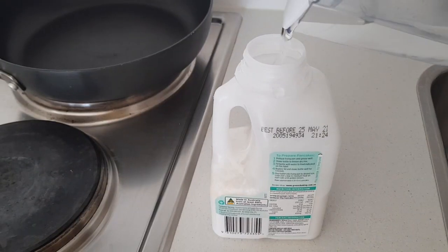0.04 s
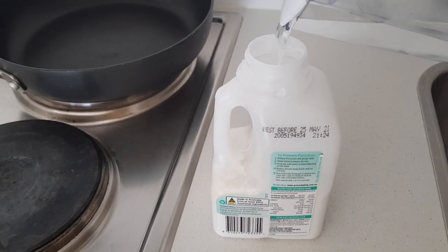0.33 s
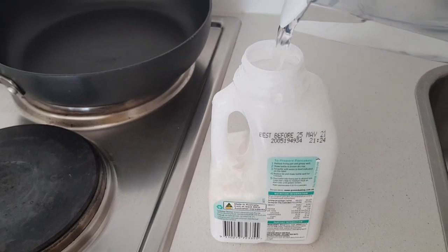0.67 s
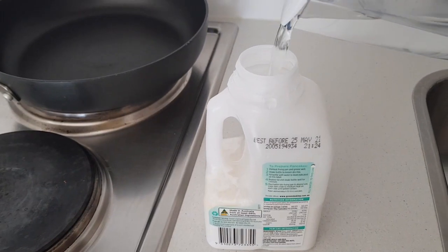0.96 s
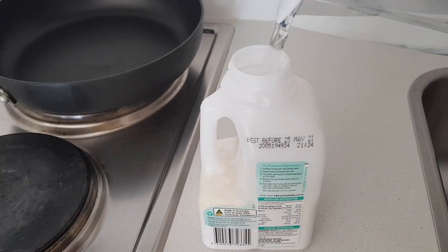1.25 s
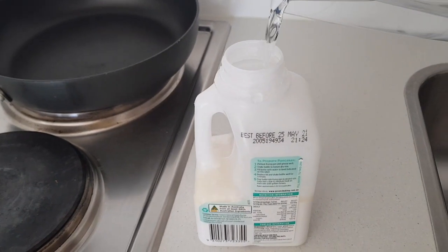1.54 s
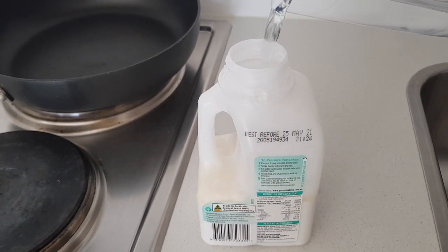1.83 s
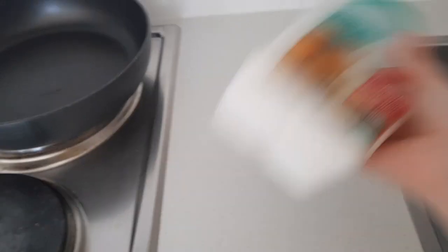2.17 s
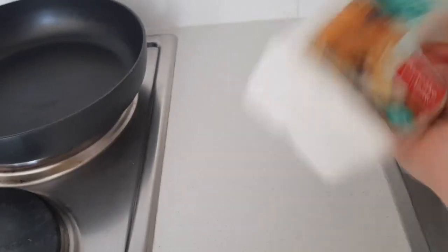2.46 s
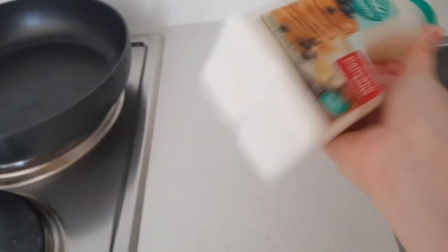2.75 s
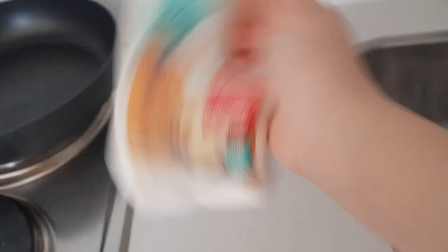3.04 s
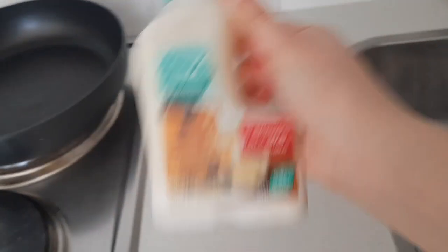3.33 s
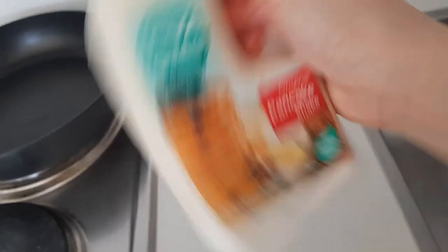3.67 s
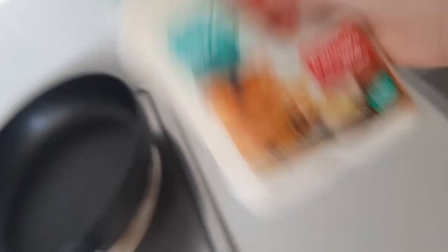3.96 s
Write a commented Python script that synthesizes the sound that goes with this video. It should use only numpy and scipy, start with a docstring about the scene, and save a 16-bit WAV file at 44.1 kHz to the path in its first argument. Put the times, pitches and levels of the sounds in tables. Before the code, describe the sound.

Water in a plastic bottle: first a thin stream patters and bubbles quietly into it, then, after a brief pause, the closed bottle is shaken hard with loud, rhythmic sloshes. Heard close up in a small kitchen.

```python
"""A thin stream of water drums into a plastic bottle on a kitchen counter; bubbles ring more and more.
After a short pause the capped bottle is shaken about four times a second. At each end of the stroke
the water slaps the wall and breaks into bubbles and spray, and towards the end it gulps through the neck.
Drops are tiny clicks and bubbles are fading tones. The room adds a short echo and a low hum."""
import sys
import numpy as np
from scipy import signal
from scipy.fft import rfft, irfft, next_fast_len
from scipy.io import wavfile
from scipy.ndimage import uniform_filter1d

SR = 44100
rng = np.random.default_rng(int(sys.argv[2]) if len(sys.argv) > 2 else 0)


def to_wav(s):
    """Save 16-bit WAV."""
    ch = np.atleast_2d(s).T  # columns
    pcm = np.round(np.clip(ch, -1, 1) * 32767)  # PCM
    wavfile.write(sys.argv[1], SR, pcm.astype(np.int16))


N = 176400  # 4 seconds
TIME = np.arange(N) / SR


def amp(db):
    """Turns decibels into a volume factor."""
    return 10 ** (np.asarray(db) / 20)


def unit(x):
    """Scales a sound to an average (rms) strength of 1."""
    return x / np.sqrt(np.mean(x ** 2) + 1e-20)


def along(points, hz):
    """Reads between the rows of a frequency table."""
    freqs, values = np.transpose(points)
    return np.interp(np.log(hz + 1), np.log(freqs + 1), values)


def level(rows):
    """Joins (seconds, dB) rows into a volume curve."""
    return amp(np.interp(TIME, *np.transpose(rows)))


def add(track, start_s, sound):
    """Mixes a sound into a track."""
    i = int(start_s * SR)
    track[i:i + len(sound)] += sound[:max(len(track) - i, 0)]


def filtered(x, response):
    """Multiplies each frequency in a sound by response(hz)."""
    size = 2 * next_fast_len(len(x) // 2 + 4096)
    return irfft(rfft(x, size) * response(np.fft.rfftfreq(size, 1 / SR)), size)[:len(x)]


def colour(x, points):
    """Turns frequencies up or down by (Hz, dB) rows."""
    def response(hz):
        cepstrum = irfft(np.log(amp(along(points, hz))))
        # folded so the filter rings only after a hit
        cepstrum[1:len(cepstrum) // 2] *= 2
        cepstrum[len(cepstrum) // 2 + 1:] = 0
        return np.exp(rfft(cepstrum))
    return filtered(x, response)


def resonate(x, modes, direct=0):
    """Rings at each (Hz, width, dB) row; direct=1 keeps the plain sound too."""
    return filtered(x, lambda f: direct + sum(
        amp(db) * 1j * f * width / (hz * hz - f * f + 1j * f * width) for hz, width, db in modes))


def band(x, lo_hz, hi_hz, order=3):
    """Keeps the sound between two frequencies."""
    sos = signal.butter(order, [lo_hz, min(hi_hz, .45 * SR)], 'band', fs=SR, output='sos')
    return signal.sosfilt(sos, x)


def linger(hits, fade_s):
    """Gives each hit a fading tail."""
    return signal.lfilter([1], [1, -np.exp(-1 / (fade_s * SR))], hits)


def burst(fade_s):
    """A puff of noise that dies away."""
    return rng.standard_normal(2048) * np.exp(-np.arange(2048) / SR / fade_s)


def drops(count, spread_db):
    """Tiny clicks of uneven size at random times."""
    when, strength, sign = rng.random((count, 3)).T
    size = amp(-spread_db * np.log(.02 + .98 * strength)) * np.sign(sign - .5)
    return unit(np.bincount((when * N).astype(int), size, N))


def bubbles(count, lo_hz, hi_hz, cycles, spread_db, rise=0.57):
    """Random tones; over `cycles` vibrations each fades 40 dB and climbs by the fraction `rise`."""
    when, pitch, strength, sign = rng.random((count, 4)).T[:, :, None]
    hz = lo_hz * (hi_hz / lo_hz) ** pitch
    age = np.arange(min(int(cycles * SR / lo_hz), 2500))
    turns = hz * age / SR
    size = amp(-spread_db * np.log(.03 + .97 * strength)) * np.sign(sign - .5) * hz
    glide = 1 + rise * np.minimum(turns / cycles, 2) / 2
    tones = size * amp(-40 * turns / cycles) * np.sin(2 * np.pi * turns * glide)
    samples = (when * N).astype(int) + age
    return unit(np.bincount(samples.ravel(), tones.ravel(), N)[:N])


# How hard the stream drums. Each row: time in seconds, relative level in dB.
DRUM_LEVELS = [(0, -28), (.15, -32), (.35, -39.5), (.55, -37.5), (1.25, -36.5), (1.6, -40), (2.02, -40)]
# The note of the bottle's base. Each row: pitch in Hz, width in Hz, gain in dB.
BASE_NOTE = [(118.2, 21.4, 0)]
def drumming():
    """The steady stream keeps the base humming at a fairly even strength."""
    ring = resonate(drops(2000, 0.99), BASE_NOTE)
    tone = signal.hilbert(unit(band(ring, 61.3, 151.6)))  # abs(tone) is its loudness
    evened = tone.real / np.sqrt(1.6 + abs(tone) ** 2)
    return amp(-1) * level(DRUM_LEVELS) * unit(evened)


# How loud the patter is. Each row: time in seconds, relative level in dB.
PATTER_LEVELS = [(0, -40.5), (.15, -48.5), (.6, -46), (1.35, -47.5), (1.48, -44.5), (1.7, -47), (2.02, -51)]
# Its dull tone. Each row: frequency in Hz, gain in dB.
PATTER_TONE = [(150, -36.5), (215, -5), (260, 1), (360, 3), (600, -5.5), (1000, -4.5), (1500, -8.5),
               (2100, -17.5), (3200, -34), (6000, -53)]
def patter():
    """Drops land on the water and stir up a few low bubbles."""
    grains = drops(5000, 2.9) + 0.28 * bubbles(1500, 259.4, 1947, cycles=21.4, spread_db=4)
    return amp(2) * level(PATTER_LEVELS) * unit(colour(grains, PATTER_TONE))


# The air in the open bottle. Each row: pitch in Hz, width in Hz, gain in dB.
AIR_NOTES = [(5000, 130, 8.5), (6000, 200, 3), (7670, 140, 5.5), (11550, 350, -4.5)]
# The bright tone of splashes. Each row: frequency in Hz, gain in dB.
SPLASH_TONE = [(2500, -10), (4000, 16), (5500, 10.5), (8200, 12.5), (10000, 14.5), (13000, 14), (16000, 12)]
def open_bottle(x):
    """Spray rings the air inside the open bottle."""
    return colour(resonate(x, AIR_NOTES, direct=1), SPLASH_TONE)


# How loud the fine splashes are. Each row: time in seconds, relative level in dB.
SPLASH_LEVELS = [(0, -48), (.1, -78), (.14, -46), (.2, -64), (.33, -59.5), (.4, -52), (.55, -48.5),
                 (.7, -53), (.92, -52), (1.2, -56), (1.5, -54.5), (1.67, -53.5), (1.9, -54), (2.02, -54)]
def splashes(spurts):
    """The stream spatters into high pings and spurts of hiss."""
    pings = bubbles(1700, 4800, 14000, cycles=60, spread_db=3.5, rise=0)
    hiss = spurts * rng.standard_normal(N)
    return amp(-5) * level(SPLASH_LEVELS) * unit(open_bottle(pings + hiss))


# The room's background noise. Each row: frequency in Hz, gain in dB.
RUMBLE_TONE = [(20, -46.5), (35, -12), (50, -8.5), (70, 2.5), (100, -8), (160, -20), (500, -18.5),
               (700, -21.5), (1700, -27.5), (3000, -46), (7500, -49), (16000, -46.5)]
def room_tone(hum_hz=49.8):
    """Steady rumble and hiss with a wavering low hum."""
    drift = np.cumsum(rng.standard_normal(N)) * 5 / np.sqrt(SR)
    hum = unit(np.sin(2 * np.pi * hum_hz * TIME + drift))
    rumble = unit(colour(rng.standard_normal(N), RUMBLE_TONE))
    return amp(-43) * (rumble + hum)


# How long the room rings. Each row: frequency in Hz, seconds to fade by 60 dB.
ECHO_TIMES = [(150, .25), (1500, 0.33), (12000, 0.072)]
def kitchen_echo(x):
    """A short room echo, duller as it dies."""
    hz, t, noise = signal.stft(rng.standard_normal(SR // 2), SR, nperseg=256)
    fade = amp(-60 * t / along(ECHO_TIMES, hz)[:, None])
    tail = signal.istft(noise * fade, SR, nperseg=256)[1]
    delayed = np.pad(x, (200, 0))
    return signal.fftconvolve(delayed, tail / np.linalg.norm(tail))[:N]


# Drops on the plastic. Each row: start in seconds, peak level in dB, pitch in Hz.
DROPLETS = [(0.011, -39, 4200), (0.3735, -43, 5820), (0.4728, -33.5, 8500), (0.5433, -34, 8370),
            (0.5614, -41, 6400), (0.622, -38, 7750), (0.82, -43, 5900), (0.9252, -39, 7950),
            (1.0983, -38, 5050), (1.2971, -44.5, 5000), (1.404, -41, 6900), (1.6089, -41, 5770),
            (1.6533, -38, 7830), (1.6727, -35.5, 7700), (1.711, -39, 8100), (1.9697, -41, 7650),
            (2.256, -31.5, 6500)]
def droplets():
    """Single droplets splash on the plastic and ring briefly."""
    out = np.zeros(N)
    for start, db, hz in DROPLETS:
        spatter = unit(open_bottle(band(burst(0.006), .8 * hz, 1.5 * hz, order=2)))
        ping = unit(band(burst(0.005), .95 * hz, 1.05 * hz, order=1))
        tick = spatter + ping
        add(out, start, amp(db) * tick / abs(tick).max())
    return out


# Clicks as the pour begins and under the grip. Each row: start in seconds, peak level in dB.
PLASTIC_CLICKS = [(0.0488, -26), (3.8604, -15.5)]
# The hand on the bottle. Each row: time in seconds, level in dB.
HAND_LEVELS = [(2.03, -87), (2.05, -59.5), (2.12, -57), (2.25, -72), (2.275, -53), (2.3, -37), (2.35, -73)]
def handling():
    """The plastic clicks as it flexes; a hand brushes it as the bottle is lifted."""
    out = level(HAND_LEVELS) * unit(band(rng.standard_normal(N), 3500, 16000, order=1))
    for start, db in PLASTIC_CLICKS:
        click = band(burst(0.003), 1300, 5500, order=1)
        add(out, start, amp(db) * click / abs(click).max())
    return out


# The growing ring of bubbles. Each row: time in seconds, level in dB.
RINGING_LEVELS = [(0.45, -72), (.6, -58.5), (1.05, -53.5), (1.2, -52.5), (1.35, -54), (1.58, -50.5),
                  (1.86, -49.5), (2.03, -52.5)]
# Their notes in the open bottle. Each row: pitch in Hz, width in Hz, gain in dB.
BUBBLE_NOTES = [(2610, 96, -7), (2350, 290, 8), (4930, 79, 2)]
def ringing(spurts):
    """The stream traps air, which rings as a crowd of small bubbles."""
    chirps = bubbles(1500, 2350, 2850, cycles=22, spread_db=2, rise=.04)
    trapped_air = unit(resonate(spurts * rng.standard_normal(N), BUBBLE_NOTES))
    return level(RINGING_LEVELS) * unit(chirps + trapped_air)


# The pour's clearest bubbles. Each row: start in seconds, relative level in dB, pitch in Hz.
CLEAR_BUBBLES = [(1.2167, -32.5, 2480), (1.423, -33.5, 2660), (1.5934, -28, 2500), (1.676, -36, 2520),
                 (1.7704, -32, 2700), (1.828, -30, 2680), (1.846, -30, 2660), (1.8971, -29, 2640)]
def plinks(swell_s=0.0029, rise_per_s=2.3):
    """Single bubbles swell quickly, then fade while their pitch climbs a little."""
    out, t = np.zeros(N), np.arange(2048) / SR
    swell = t / swell_s * np.exp(1 - t / swell_s)
    glide = 1 + rise_per_s * (t / 2 - swell_s)
    for start, db, hz in CLEAR_BUBBLES:
        add(out, start, amp(db - 4) * swell * np.sin(2 * np.pi * hz * t * glide))
    return out


# The notes of the capped bottle. Each row: pitch in Hz, width in Hz, gain in dB.
CAPPED_NOTES = [(286.8, 9.7, 1), (361, 21, 2), (469, 37, -11), (845, 62, -13), (1310, 190, -12),
                (1630, 34, -5), (2066, 440, -5)]
def capped_bottle(x):
    """The shut bottle adds its own ring to a sound inside it."""
    return resonate(x, CAPPED_NOTES, direct=1)


# Water hits an end of the bottle. Each row: start in seconds, hold time in seconds,
# then relative levels in dB for thump, gurgle, froth and spray (layers 0 to 3).
SLOSH_HITS = [(2.296, 0.033, -28, -31, -38, -33), (2.463, 0.048, -27, -30.5, -28.5, -32),
              (2.55, 0.0072, -38, -26.5, -28, -31), (2.57, 0.043, -43, -30, -31, -33.5),
              (2.693, 0.016, -47, -27.5, -29.5, -35.5), (2.716, 0.014, -28, -40, -28.5, -29.5),
              (2.814, 0.024, -33, -28.5, -27, -33), (2.944, 0.018, -30, -31, -26.5, -30.5),
              (3.006, 0.039, -39, -41, -37, -33), (3.04, 0.039, -37, -28.5, -32.5, -34.5),
              (3.187, 0.016, -38, -52, -29, -29.5), (3.278, 0.027, -50, -40, -30.5, -34.5),
              (3.415, 0.014, -43, -50, -32, -34.5), (3.425, 0.0079, -33, -47, -29.5, -32),
              (3.513, 0.012, -27, -26, -30.5, -28), (3.63, 0.038, -36, -33, -29.5, -34.5),
              (3.721, 0.039, -46, -30, -33, -36.5), (3.87, 0.035, -56, -28.5, -34, -39),
              (3.967, 0.034, -57, -34, -32, -33)]
# Water running between hits. Each row: time in seconds, relative level in dB.
CHURN_LEVELS = [(2.26, -84), (2.295, -38), (2.35, -40.5), (2.45, -45), (2.53, -35), (2.77, -33.5),
                (2.86, -37.5), (2.905, -47.5), (2.97, -30), (3.09, -43), (3.15, -42.5), (3.22, -33.5),
                (3.34, -33.5), (3.39, -46.5), (3.46, -35.5), (3.61, -41), (3.78, -40), (3.85, -33),
                (3.95, -37.5)]
def surge(layer, fall_s, churn_db, rise_s=0.00059):
    """One layer's volume curve: each slosh rises, holds and falls back into the churning."""
    volume = amp(churn_db) * level(CHURN_LEVELS)
    for start, hold, *layer_db in SLOSH_HITS:
        age = TIME - start
        shape = np.exp(np.minimum(age, 0) / rise_s - np.maximum(age - hold, 0) / fall_s)
        volume = np.maximum(volume, amp(layer_db[layer]) * shape)
    return volume


def shifting_air(x, depth_db=1.8):
    """The air space changes shape as the water moves, so pitches come and go at random."""
    spectrum = signal.stft(x, nperseg=512)[2]
    wander = rng.standard_normal(spectrum.shape)
    for axis in (0, 1, 0, 1):
        wander = uniform_filter1d(wander, size=4, axis=axis)
    gain = amp(depth_db * np.clip(unit(wander), -2, 2))
    return signal.istft(spectrum * unit(gain), nperseg=512)[1][:N]


# The tone of shaken water. Each row: frequency in Hz, gain in dB.
SLOSH_TONE = [(88, -41.5), (150, -4.5), (244, -20), (291, -9), (328, -15), (466, -13), (524, -21.5),
              (702, -5), (837, -0.5), (1170, -6), (2180, -7.5), (3040, -16), (6640, -24), (8070, -21),
              (11000, -23), (15100, -29.5), (16000, -52)]
def sloshing():
    """Water thumps the wall and lands in uneven lumps, breaking into bubbles and spray."""
    landings = 1. * (rng.random(N) < 110 / SR)  # about 110 a second
    lumps = unit(np.sqrt(2.05 + 2 * linger(landings, 0.0058)))

    def shaken(grains, lo_hz, hi_hz, volume):
        def inside(x):
            return capped_bottle(band(colour(x, SLOSH_TONE), lo_hz, hi_hz))
        return inside(grains * volume * lumps) / np.std(inside(grains))

    thump = unit(band(drops(1500, 1.2), 81, 160)) * surge(0, fall_s=0.015, churn_db=-7.5)
    big = bubbles(2200, 175, 930, cycles=8.1, spread_db=2.3)
    gurgle = shaken(big, 188, 572, surge(1, fall_s=0.012, churn_db=-3))
    small = bubbles(3000, 678, 4280, cycles=12.4, spread_db=2) + 0.54 * drops(4000, 1.4)
    froth = shaken(small, 857, 5100, surge(2, fall_s=0.012, churn_db=-1.9))
    tiny = bubbles(5000, 2700, 14100, cycles=53, spread_db=1.4, rise=0) + 1.9 * drops(12000, 0.65)
    spray = shaken(tiny, 2900, 18000, surge(3, fall_s=0.017, churn_db=-5.5))
    return amp(-1.5) * thump + amp(-2) * gurgle + shifting_air(froth) + spray


# Hard slaps. Each row: start in seconds, relative level in dB, brightness in Hz.
WALL_SLAPS = [(2.3002, -8.5, 1030), (2.4653, -6.5, 1370), (2.499, -12, 1580), (2.589, -8, 1400),
              (2.61, -12.5, 1580), (2.724, -11, 2800), (2.8172, -24, 1700), (2.9458, -9, 1500),
              (2.991, -24, 1910), (3.054, -10.5, 1660), (3.17, -19, 1490), (3.197, -12.5, 1910),
              (3.287, -8.5, 3160), (3.2995, -13, 2840), (3.405, -14.5, 2430), (3.431, -14.5, 3020),
              (3.517, -14, 2210), (3.605, -18.5, 1940), (3.6289, -17.5, 2720), (3.6609, -16.5, 1700),
              (3.724, -16.5, 6700), (3.983, -11, 3060)]
def slaps():
    """A lump of water pushes the wall once and cracks against it."""
    out, t = np.zeros(N), np.arange(2048) / SR
    for start, db, hz in WALL_SLAPS:
        age = t * hz * 3.15
        push = age * (2 - age) * np.exp(-age)
        crack = 0.21 * band(burst(0.0091), 210, 1.61 * hz) + 0.058 * burst(0.0029)
        slap = capped_bottle(push + crack)
        add(out, start, amp(db - 1.5) * slap / abs(slap).max())
    return out


# Short swelling tones. Each row: start in seconds, pitch in Hz, relative level in dB, length in seconds.
GULPS_AND_THUMPS = [(2.301, 379.5, -19, 0.071), (2.5, 120, -24.5, 0.15), (2.579, 295, -18.5, 0.027),
                    (2.693, 465, -19.5, 0.014), (2.951, 110, -26.5, 0.085), (3.429, 2240, -13, 0.012),
                    (3.74, 367, -20, 0.013), (3.784, 450, -19, 0.029), (3.819, 338, -20.5, 0.045),
                    (3.878, 290.7, -22.5, 0.093), (3.966, 292, -21.5, 0.029)]
def gulps_and_thumps(rise=0.015):
    """Gulps, one small high bubble and two low ringing thumps of the bottle, each rising a little."""
    out = np.zeros(N)
    for start, hz, db, length in GULPS_AND_THUMPS:
        t = np.arange(int(3 * length * SR)) / SR
        age = t / (0.19 * length)  # 1 at the loudest point
        swell = age ** 2 * np.exp(2 - 2 * age)
        glide = 1 + rise * (t / length - 1) / 2
        add(out, start, amp(db - 4) * swell * np.sin(2 * np.pi * hz * t * glide))
    return out


# The bottle's hollow body. Each row: pitch in Hz, width in Hz, gain in dB.
BODY_NOTES = [(288, 61, -5), (607, 61, -4.5), (874, 62, -3)]
def knock(start_s=3.038, peak_db=-11.5):
    """Most of the water lands on the base at once with a hollow knock."""
    out, t = np.zeros(N), np.arange(8192) / SR
    push = np.exp(-np.minimum(t / 0.00066, 20))
    ring = resonate(push, BODY_NOTES)
    add(out, start_s, amp(peak_db) * ring / abs(ring).max())
    return out


POUR_END_S = 2.034
def scene():
    """Pouring, then shaking, close by in a small kitchen."""
    pour = patter()
    spurts = unit(np.sqrt(linger(drops(420, 6) ** 2, 0.0028)))  # the stream's uneven strength
    pour += splashes(spurts) + ringing(spurts) + drumming() + plinks()
    pour *= TIME < POUR_END_S
    water = pour + droplets() + handling() + sloshing() + slaps() + knock() + gulps_and_thumps()
    return (water + amp(-13) * kitchen_echo(water) + room_tone())[None]


def record(dry, resume_s=2.049, dip_s=3.8695, top_hz=16100):
    """The sound drops out after the pour and dips briefly near the end; the highest treble is cut."""
    gate = uniform_filter1d(1. * ((TIME < POUR_END_S) | (TIME > resume_s)), size=90)
    dip = 1 - np.exp(-((TIME - dip_s) / .005) ** 2)
    return filtered(dry[0] * gate * dip, lambda hz: hz < top_hz)[None]


dry = scene()
out = record(dry)
to_wav(out)
```